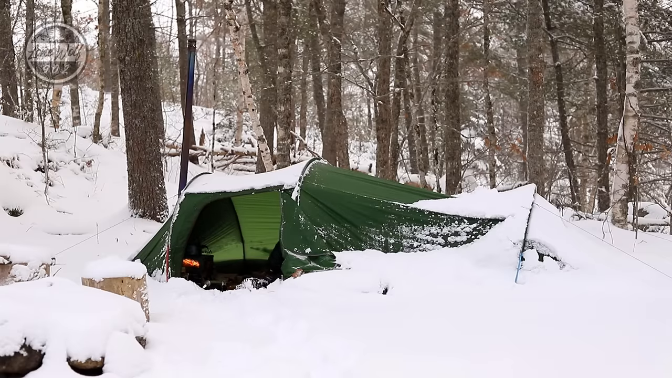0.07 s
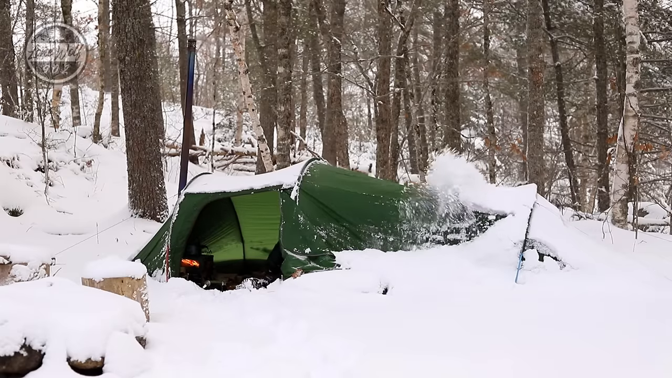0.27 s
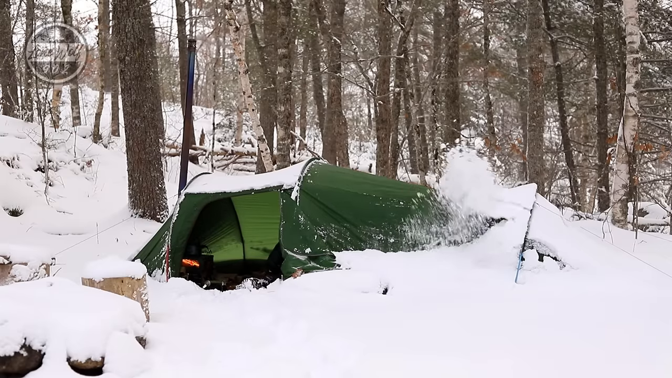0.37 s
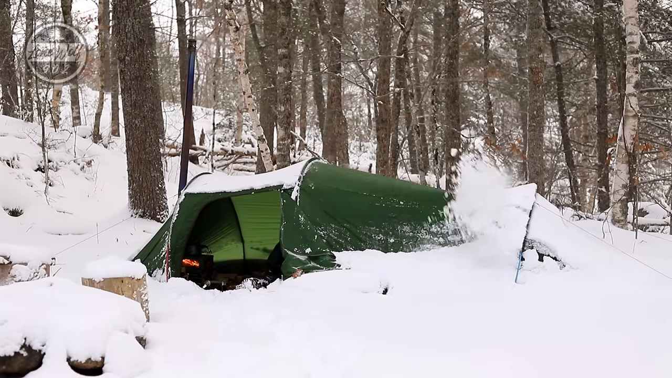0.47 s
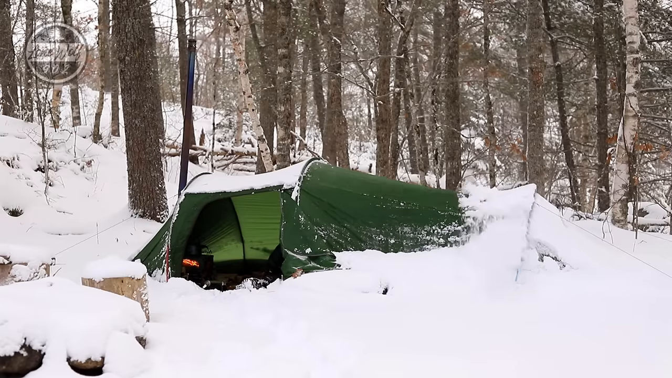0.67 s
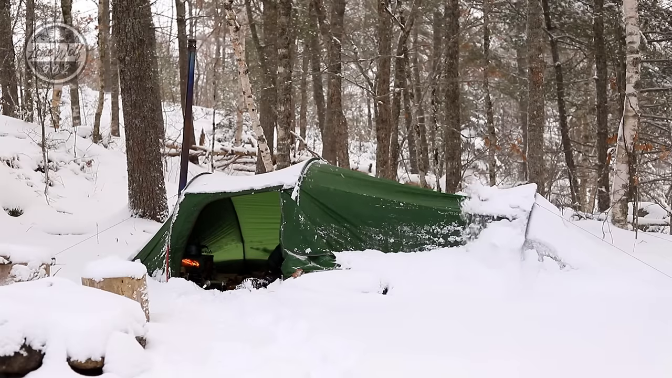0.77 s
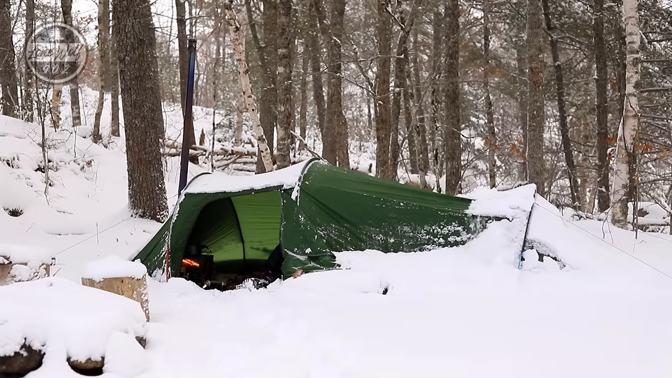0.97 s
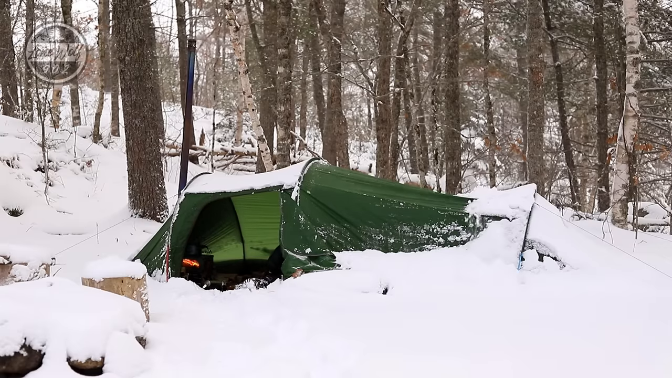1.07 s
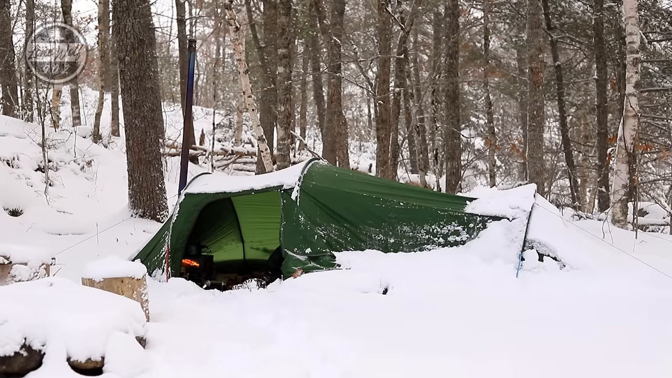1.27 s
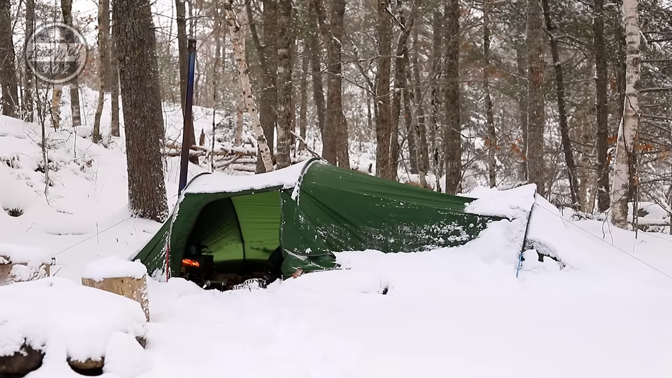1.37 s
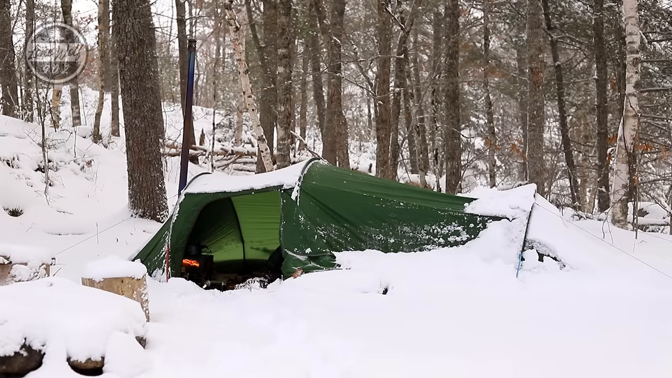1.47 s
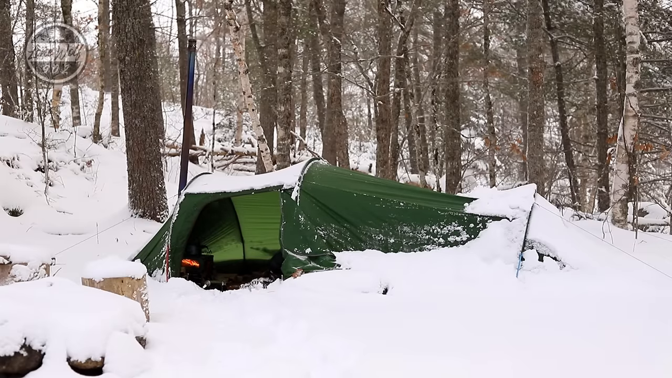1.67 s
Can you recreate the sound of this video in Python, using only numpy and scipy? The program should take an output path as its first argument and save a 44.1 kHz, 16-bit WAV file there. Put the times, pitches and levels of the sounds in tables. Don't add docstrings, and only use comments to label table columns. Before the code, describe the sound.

Three muffled slaps on tent fabric knock snow loose with gritty crunches, sharp snaps and sliding hiss.

```python
import sys
import numpy as np
from scipy import signal
from scipy.io import wavfile

SR = 44100
rng = np.random.default_rng(int(sys.argv[2]) if len(sys.argv) > 2 else 0)


def gain_from_db(level_db):
    decades = np.asarray(level_db, float) / 20
    return 10 ** decades


def file_out(sig):
    cols = np.atleast_2d(sig).T
    lim = np.clip(cols, -1, 1)
    pcm = np.round(lim * 32767).astype(np.int16)
    wavfile.write(sys.argv[1], SR, pcm)


N = 74970


def rms_one(x):
    return x / np.sqrt(np.mean(x ** 2) + 1e-20)


def curve_db(rows):
    return np.interp(np.arange(N) / SR, *np.transpose(rows))


def drift(rate_hz):
    step = 40
    pole = np.exp(-2 * np.pi * rate_hz * step / SR)
    noise = rng.standard_normal(N // step + 2002)
    slow = signal.lfilter([1], [1, -2 * pole, pole ** 2], noise)[2000:]
    return np.interp(np.arange(N) / step, np.arange(len(slow)), rms_one(slow))


def grains(per_s, spread_db):
    sizes = gain_from_db(spread_db * np.minimum(rng.exponential(1, N), 4))
    signs = rng.choice([-1, 1], N)
    struck = rng.random(N) < per_s / SR
    return rms_one(sizes * signs * struck + 1e-9)


def band_pass(x, order, low_hz, high_hz):
    return signal.sosfilt(signal.butter(order, [low_hz, high_hz], "band", fs=SR, output="sos"), x)


def colour(sources, spectrum, patchy_db):
    spectrum_hz, spectrum_db = np.transpose(spectrum)
    edges = 30 * 2 ** np.arange(0, 9.6, 0.5)
    out, power = 0, 0
    for k, (low, high) in enumerate(zip(edges, edges[1:])):
        centre = np.log(low * high) / 2
        gain = gain_from_db(np.interp(centre, np.log(spectrum_hz), spectrum_db))
        band = band_pass(sources[k % 2], 2, low, high)
        out = out + gain * gain_from_db(patchy_db * drift(18.5)) * band
        power = power + gain ** 2 * (high - low) * 2 / SR
    return out / np.sqrt(power)


def resonance(x, hz, width_hz):
    radius, angle = np.exp(-np.pi * width_hz / SR), 2 * np.pi * hz / SR
    zeros = (1 - radius ** 2) / 2 * np.array([1, 0, -1])
    return signal.lfilter(zeros, [1, -2 * radius * np.cos(angle), radius ** 2], x)


# pitch_hz [Hz], level_db [dB per Hz]
AIR_SPECTRUM = [(60, -16), (130, -5.5), (200, -9.5), (700, -12), (1500, -17.5), (3000, -24), (6000, -28),
                (15000, -30.5)]
AIR_DB = -52.5


def forest_air():
    return gain_from_db(AIR_DB) * colour(rng.standard_normal((2, N)), AIR_SPECTRUM, patchy_db=0.66)


# start_s [s], level_db [dB]
WIND_LEVEL = [
    (0, -59),
    (.3, -70),
    (.55, -46),
    (.9, -62.5),
    (1.3, -60.5),
    (1.42, -58),
    (1.55, -47.5),
    (1.7, -55.5),
]
WIND_CUT_HZ, WIND_LUMP_DB = 62, 3


def wind():
    noise = rng.standard_normal(N + SR)
    rumble = band_pass(noise, 3, 16, WIND_CUT_HZ)[SR:]
    return gain_from_db(curve_db(WIND_LEVEL) + WIND_LUMP_DB * drift(35)) * rms_one(rumble)


# delay_s [s], level_db [dB]
TREE_ECHOES = [
    (.021, -23),
    (.047, -23),
    (.083, -24.5),
]


def tree_echoes(tent):
    dull = signal.lfilter([0.4], [1, -0.6], tent)
    echoes = np.zeros(N)
    for delay_s, level_db in TREE_ECHOES:
        echoes += gain_from_db(level_db) * np.concatenate([np.zeros(int(delay_s * SR)), dull])[:N]
    return echoes


# start_s [s], level_db [dB]
SLIDE_LEVEL = [(0, -62), (.198, -72), (.21, -38), (.29, -40.5), (.38, -45), (.42, -46.5), (.48, -46.5),
               (.55, -41), (.62, -41), (.68, -40.5), (.80, -44), (.89, -49.5), (1.05, -50.5), (1.2, -57.5),
               (1.33, -55.5), (1.45, -56.5), (1.7, -63)]
# pitch_hz [Hz], level_db [dB per Hz]
HISS_SPECTRUM = [(40, 1), (100, 4), (290, -8.5), (850, -4), (1600, -5), (2600, -7.5), (4500, -18),
                 (17000, -34.5)]


def slide(clumps):
    flow = clumps * gain_from_db(curve_db(SLIDE_LEVEL) + 0.56 * drift(17))
    sources = [flow * grains(8000, 2.23) for _ in range(2)]
    return colour(sources, HISS_SPECTRUM, patchy_db=0.5)


# start_s [s], rise_s [s], hold_s [s], level_db [dB], powder treble_db [dB]
FLURRY_EVENTS = [(0.201, 0.0018, 0.0028, -34.5, -5), (0.217, 0.015, 0.0033, -23, -9),
                 (0.23, .010, 0.0067, -19.5, -8), (0.257, 0.0029, .012, -46, 13),
                 (0.297, 0.028, 0.049, -41, 2.5), (0.463, 0.0027, 0.014, -42.5, -7),
                 (.488, 0.0026, 0.023, -27.5, -4.5), (0.523, 0.0046, 0.014, -33, -4),
                 (0.559, .005, 0.017, -36, -1.5), (0.686, 0.002, 0.003, -36, -2),
                 (0.705, 0.012, 0.014, -32, 3.5), (0.737, 0.014, 0.028, -34, -3),
                 (0.788, 0.0037, 0.005, -42, -5), (0.817, .008, 0.041, -47.5, 8),
                 (0.93, 0.013, 0.1, -54.5, 9), (1.239, 0.027, .010, -51.5, 8),
                 (1.285, 0.0047, 0.013, -47, 5.5)]
# pitch_hz [Hz], level_db [dB per Hz]
CRUNCH_SPECTRUM = [(60, -16), (200, -1.5), (320, -6.5), (750, -1), (1550, -3), (2700, -10), (4600, -24),
                   (9000, -39.5)]
# pitch_hz [Hz], level_db [dB per Hz]
POWDER_SPECTRUM = [(3000, -3.5), (4600, 7.5), (6500, -21), (9500, 11), (13000, 2), (18000, -22)]
POWDER_DB = -15.5
FLURRY_FALL_S = 0.016


def flurries(clumps):
    t = np.arange(N) / SR
    crunch_power, powder_power = np.zeros(N), np.zeros(N)
    for start_s, rise_s, hold_s, level_db, treble_db in FLURRY_EVENTS:
        rise = np.clip((t - start_s) / rise_s, 0, 1)
        fall = np.exp(-np.clip(t - start_s - rise_s - hold_s, 0, 1) / FLURRY_FALL_S)
        crunch_power += (gain_from_db(level_db) * rise * fall) ** 2
        powder_power += (gain_from_db(level_db + treble_db) * rise * fall) ** 2
    crunch = [clumps * np.sqrt(crunch_power) * grains(5000, 3.0) for _ in range(2)]
    powder = [clumps * np.sqrt(powder_power) * grains(18000, 2.6) for _ in range(2)]
    body = colour(crunch, CRUNCH_SPECTRUM, patchy_db=1.36)
    return body + gain_from_db(POWDER_DB) * colour(powder, POWDER_SPECTRUM, patchy_db=1.85)


# start_s [s], level_db [dB, peak], pitch_hz [Hz], crack_db [dB re swing]
SNAP_EVENTS = [(.2260, -15, 744, -18), (.2362, -24, 1560, -8), (.2520, -17.5, 1160, -6),
               (.269, -19, 1500, -16), (.3060, -29.5, 1160, 4.5), (.3372, -29, 1370, 5),
               (.3475, -38, 1512, 11), (.3680, -27.5, 2500, -4), (.4565, -27.5, 1245, -5),
               (.4890, -19, 1500, -14), (.5258, -21.5, 980, -5), (.5680, -29, 2000, 5),
               (.5885, -28, 1170, -14), (.7190, -21, 2960, 1), (.7265, -17, 576, -10),
               (.7410, -13.5, 1020, -16), (.7783, -18, 940, -6), (.8275, -33.5, 2460, 1),
               (.8480, -29.5, 2000, -2), (.877, -41, 2480, 8), (0.964, -43, 1220, 4),
               (1.092, -37, 1100, -9), (1.2425, -35.5, 1300, 4.5), (1.2915, -31.5, 1490, -9),
               (1.2945, -30.5, 1450, -6), (1.300, -33.5, 1900, 3.5), (1.304, -34, 1570, -6)]
SNAP_CYCLES = 0.31
CRACK_S, CRACK_CUT_HZ, CRACK_AIR_DB = 0.0007, 4300, -21


def snaps():
    swings, cracks = np.zeros(N + SR), np.zeros(N + SR)
    t = np.arange(400) / SR
    for start_s, level_db, pitch_hz, crack_db in SNAP_EVENTS:
        start = int(start_s * SR)
        at = slice(start, start + len(t))
        pulse = np.exp(-0.5 * ((t * pitch_hz - 0.5) / SNAP_CYCLES) ** 2)
        swings[at] += gain_from_db(level_db) * np.sin(2 * np.pi * pitch_hz * t) * pulse
        noise = rng.standard_normal(len(t))
        cracks[at] += gain_from_db(level_db + crack_db) * np.exp(-t / CRACK_S) * noise
    dull_cracks = band_pass(cracks + 1e-18, 2, 500, CRACK_CUT_HZ)
    return (swings + dull_cracks + gain_from_db(CRACK_AIR_DB) * cracks)[:N]


# [s, time to fall 60 dB]
BOOM_EVENTS = [(.035, -49.5, 133.5, 0.36), (0.203, -27.5, 117, 0.081), (0.225, -15.5, 191, 0.053),
               (0.236, -21.5, 153, 0.065), (0.246, -32, 68.3, 0.22), (0.359, -37, 180, 0.044),
               (0.376, -39, 94, 0.16), (0.489, -25, 94, 0.14), (0.493, -26.5, 198, 0.049),
               (.50, -31.5, 62.5, 0.2), (.56, -36, 61.4, 0.12), (0.701, -32, 68, .2),
               (.692, -33, 182, 0.081), (0.724, -27, 135, 0.055), (0.758, -37, 79.5, 0.24),
               (0.832, -41, 70, 0.15), (1.28, -49, 110, 0.13), (1.60, -40.5, 127, 0.16)]
BOOM_RISE_S = 0.0041


def booms():
    out = np.zeros(N)
    for start_s, level_db, pitch_hz, t60_s in BOOM_EVENTS:
        t = np.clip(np.arange(N) / SR - start_s, 0, None)
        envelope = gain_from_db(level_db - 60 * t / t60_s) * (1 - np.exp(-t / BOOM_RISE_S))
        out += envelope * np.sin(2 * np.pi * pitch_hz * t)
    return out


def fabric_ring(tent):
    return tent + gain_from_db(-3.0) * resonance(tent, hz=3450, width_hz=550)


def scene():
    clumps = gain_from_db(1 * drift(103))
    tent = fabric_ring(flurries(clumps) + snaps() + booms())
    return (forest_air() + wind() + slide(clumps) + tent + tree_echoes(tent))[None]


def band_limit(x):
    return signal.sosfilt(signal.butter(12, 15710, fs=SR, output="sos"), x)


def record(dry):
    peaked = dry + gain_from_db(1) * resonance(dry, hz=3376, width_hz=376)
    dipped = peaked - 0.13 * resonance(peaked, hz=2546, width_hz=1800)
    top_cut = signal.ellip(16, 0.5, 70, 15720, fs=SR, output="sos")
    mix = signal.sosfilt(top_cut, dipped)
    return band_limit(mix)


dry = scene()
out = record(dry)
file_out(out)
```